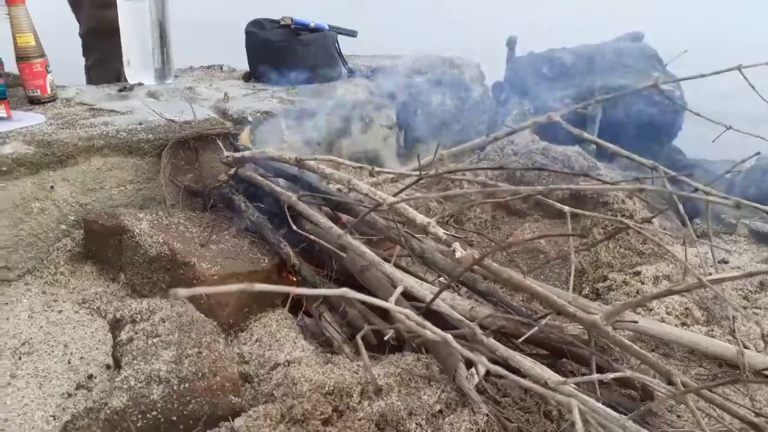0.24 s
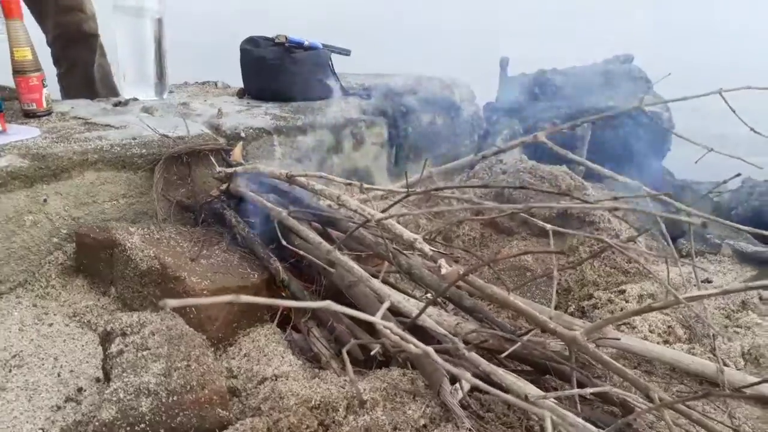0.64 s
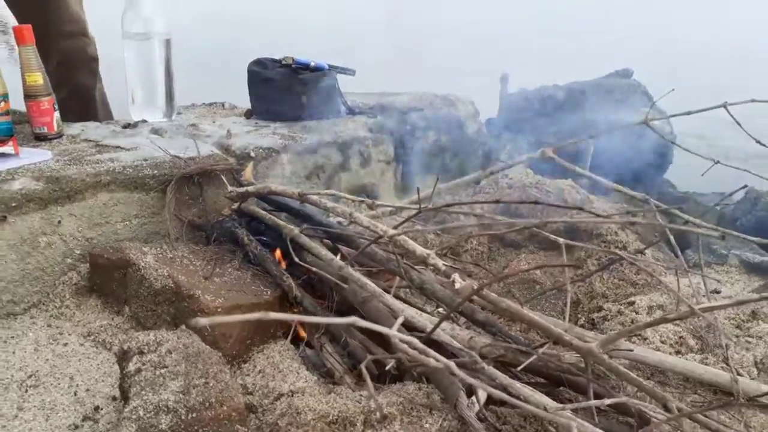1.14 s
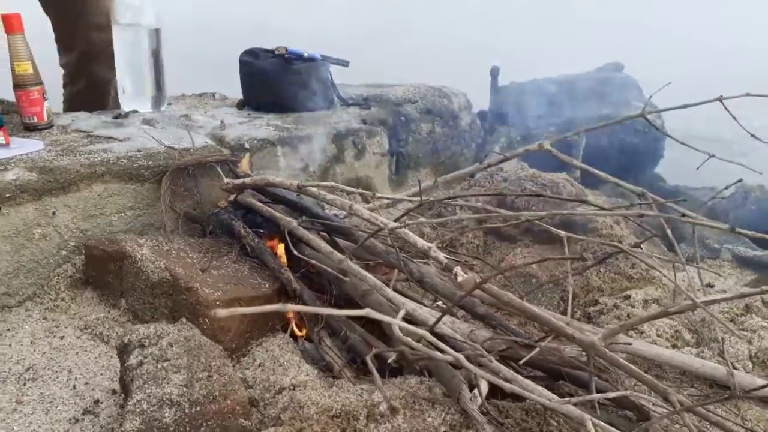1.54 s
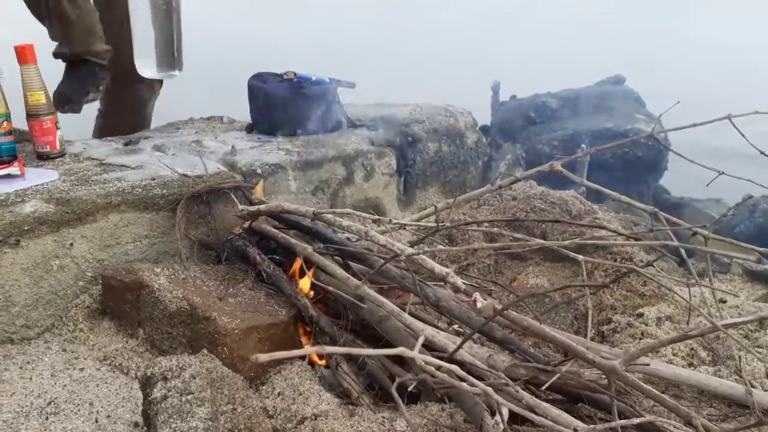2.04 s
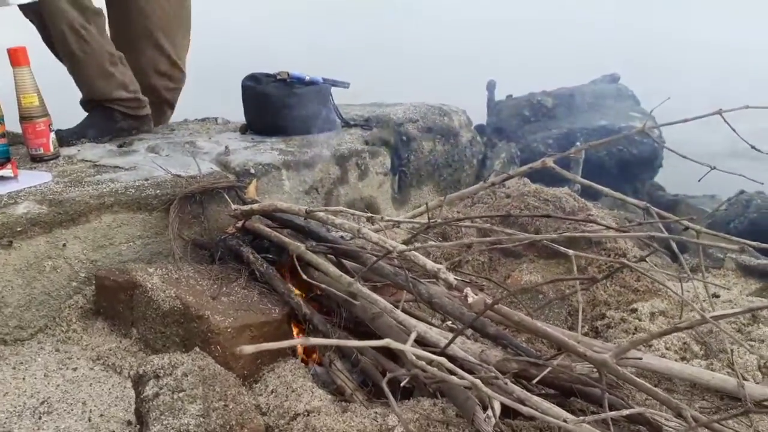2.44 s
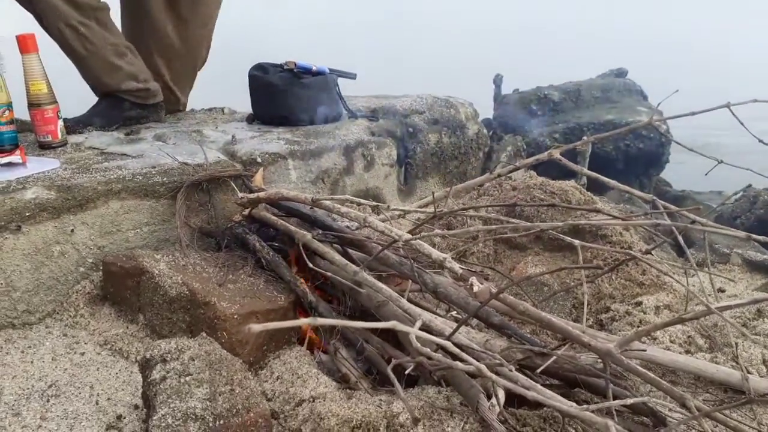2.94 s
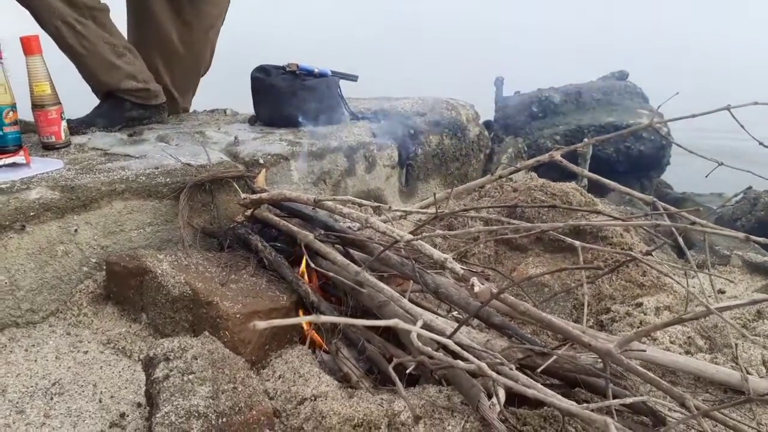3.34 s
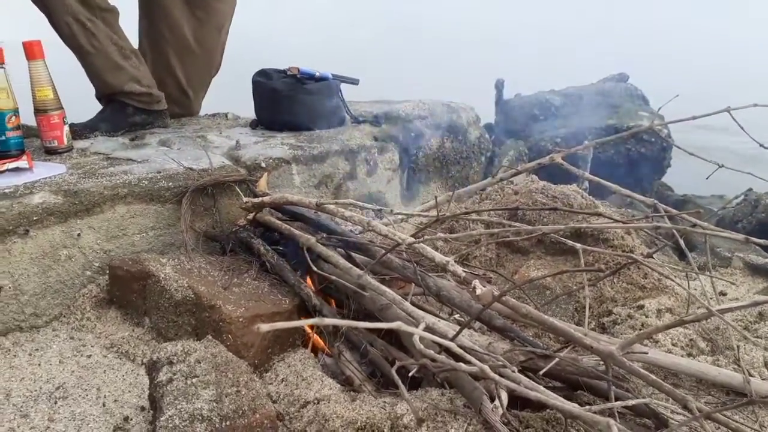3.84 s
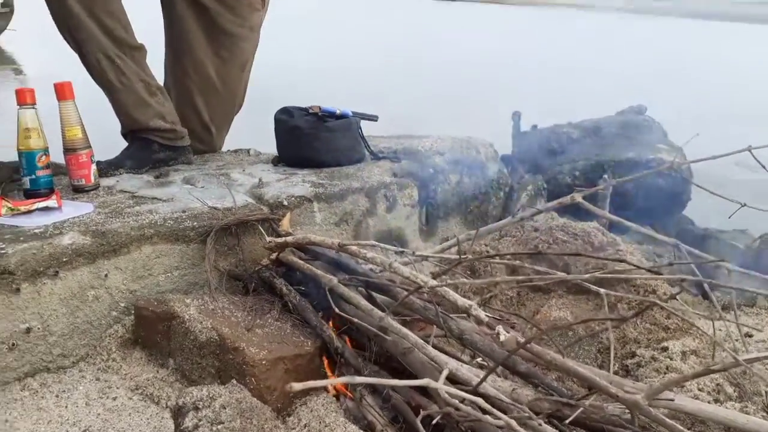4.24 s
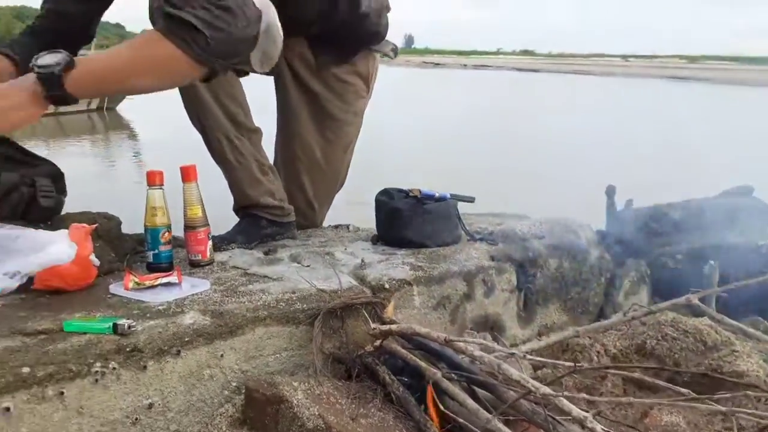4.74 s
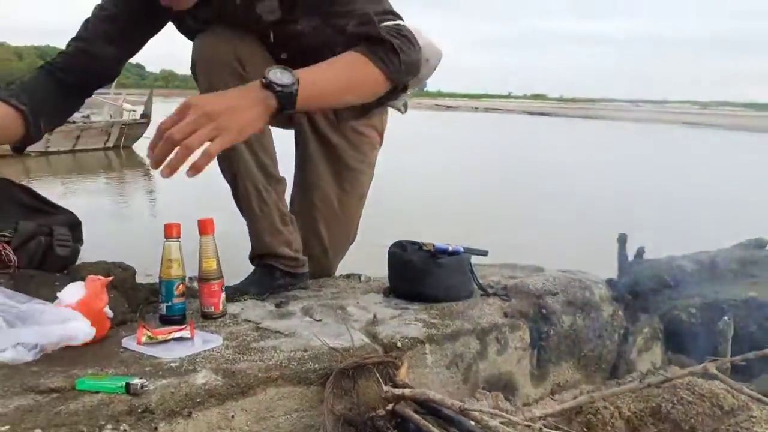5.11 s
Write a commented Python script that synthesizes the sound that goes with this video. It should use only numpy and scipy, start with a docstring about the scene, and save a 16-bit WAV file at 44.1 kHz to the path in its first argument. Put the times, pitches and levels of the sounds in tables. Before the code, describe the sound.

A small fire of dry sticks outdoors, heard close in stereo with hardly any echo, over a steady deep, distant rumble and a fine soft hiss. The opening is quiet, with faint foot scuffs and a weak dull pop at 0.4 s. Near 0.95 s a shoe scrapes gritty ground, together with a strong hollow pop and a few small cracks. After a lull, another slight scrape leads to a loud sharp snap and pop at 2.5 s. At 3.1 s a low thudding pop and brief rub come as steam escapes: a faint, very high whistle, slightly to the right, rises, sags and stops about 3.8 s. Meanwhile crackles thicken from 3.4 to 4.3 s. A bottle touches at 4.2 s and lands with a short, damped knock at 4.4 s, rocking faintly. Pops and shifting sticks come at 4.7-4.9 s, then a plastic bag rustles and flaps, swelling to the end.

```python
"""Small stick fire on a river bank

Dry sticks snap (bursts of noise over a ringing hollow), pop (damped sines) and shift (rubbing noise);
once, steam whistles out of a stick as a gliding sine. Beside it a sole scuffs gritty ground and a bag
rustles (grainy noise under hand-drawn swells), and a bottle is set down on a ledge (ringing modes).
Rumble and hiss of shaped noise lie under it all; near sounds reach the left microphone port first."""
import sys
import numpy as np
from scipy import signal
from scipy.fft import rfft, irfft, next_fast_len
from scipy.io import wavfile
from scipy.ndimage import uniform_filter1d, map_coordinates

SR = 44100
rng = np.random.default_rng(int(sys.argv[2]) if len(sys.argv) > 2 else 0)


def unload_wav(signal):
    """Save mono or channel-first audio to the path in sys.argv[1] as 16-bit WAV at rate SR, clipped to [-1, 1]."""
    wavfile.write(
        sys.argv[1],
        SR,
        np.round(np.clip(np.atleast_2d(signal).T, -1, 1) * 32767).astype(np.int16),
    )


N = 236903  # length in samples


def amp(db):
    """Decibels to gain."""
    return 10 ** (np.asarray(db) / 20)


def unit(x):
    """Scale to rms 1."""
    return x / np.sqrt(np.mean(x ** 2) + 1e-20)


def along(points, hz):
    """Read (f/Hz, value) points on a log frequency axis."""
    f, v = np.transpose(points)
    return np.interp(np.log(hz + 1), np.log(f + 1), v)


def curve(rows):
    """Draw straight lines through (t/s, value) points, one value per sample."""
    s, values = np.transpose(rows)
    return np.interp(np.arange(N) / SR, s, values)


def wobble(rate):
    """A smooth random curve, rate knots a second."""
    knots = rng.standard_normal(int(N * rate / SR) + 4)
    return map_coordinates(knots, [np.arange(N) * rate / SR])


def ramp(start, length):
    """Rise from 0 to 1 over length seconds."""
    return np.clip((np.arange(N) / SR - start) / length, 0, 1)


def strokes(rows):
    """Gain of a series of movements, each swelling to its peak and dying away."""
    t = np.arange(N) / SR
    power = 0
    for s, db, rise, fall in rows:
        drop_db = 20 * np.maximum((s - t) / rise, (t - s) / fall)
        power = power + amp(db - drop_db) ** 2
    return np.sqrt(power)


def filtered(x, response):
    """Multiply the spectrum of x by a response of frequency."""
    m = next_fast_len(N + SR // 2)
    return irfft(rfft(x, m) * response(np.fft.rfftfreq(m, 1 / SR)), m)[..., :N]


def coloured(x, spectrum, size=4096):
    """Causal (minimum-phase) filter with the given spectrum; white noise keeps its power."""
    level_db = np.maximum(along(spectrum, np.fft.rfftfreq(size, 1 / SR)), -100)
    cepstrum = irfft(np.log(amp(level_db)))
    # fold the cepstrum forward in time, so that nothing sounds early
    cepstrum[1:size // 2] *= 2
    cepstrum[size // 2 + 1:] = 0
    kernel = irfft(np.exp(rfft(cepstrum)))
    return signal.fftconvolve(x, kernel[None] / np.linalg.norm(kernel), axes=1)[:, :N]


def blend(pair, alike):
    """Mix two unrelated signals into left and right of the given likeness."""
    def shares(hz):
        turn = np.arccos(np.clip(along(alike, hz), -1, 1)) / 2
        return np.array([np.cos(turn), np.sin(turn)])

    mid, side = filtered(pair, shares)
    return np.array([mid + side, mid - side])


def add(track, s, sound):
    """Mix a sound into a track at time s."""
    start = round(s * SR)
    track[..., start:start + sound.shape[-1]] += sound[..., :N - start]


def ring(modes, scatter_db, detune, rise, size=8000):
    """Damped modes of one blow, each at a new strength and slightly new pitch."""
    t = np.arange(size) / SR
    waves = np.zeros(size)
    for hz, db, t60 in modes:
        strength, bend = rng.standard_normal(2)
        decay = amp(db + scatter_db * strength - 60 * t / t60)
        waves += decay * np.sin(2 * np.pi * hz * (1 + detune * bend) * t)
    return waves * (1 - np.exp(-t / rise))


def tear(rise, t60, spiky_db, size=3000):
    """A quick run of breaking fibres: a spiky burst with the energy of 10 ms at rms 1."""
    t = np.arange(size) / SR
    fibres = amp(spiky_db * unit(uniform_filter1d(rng.standard_normal(size), size=12)))
    envelope = (1 - np.exp(-t / rise)) ** 2 * amp(-60 * t / t60)
    burst = rng.standard_normal((2, size)) * fibres * envelope
    return unit(burst) * np.sqrt(SR / 100 / size)


# likeness of near sounds at the two ports: f/Hz, likeness/0-1
NEAR_LIKENESS = [(400, 1), (1500, 0.71), (5000, 0.56), (14000, 0.21)]


def grains(spectrum, rate, spread_db, smooth):
    """Dense tiny clicks of uneven size, rate a second, on a bed of noise, rms 1."""
    sizes = amp(spread_db * np.clip(rng.standard_normal(N), -2, 2))
    clicks = (rng.random(N) < rate / SR) * sizes
    envelope = signal.lfilter([1], [1, -np.exp(-1 / 36)], clicks)  # time constant of 36 samples
    noise = rng.standard_normal((2, N)) * (unit(envelope) + smooth)
    return unit(blend(coloured(noise, spectrum), NEAR_LIKENESS))


# noise colours of the rumble and the hiss: f/Hz, relative level/dB
RUMBLE_COLOUR = [(12, -62), (20, -49), (32, -39.5), (41, -28), (54, -2), (102, 1), (157, -2.5), (242, -7),
                 (317, -18), (387, -23.5), (447, -25.5), (498, -33.5), (715, -38.5), (921, -40),
                 (1500, -47), (1950, -62), (3300, -120)]
HISS_COLOUR = [(590, -42), (1000, -15), (1300, -15), (1480, -8.5), (1720, -11), (2660, -11.5), (2880, -13),
               (3750, -15), (4610, -6), (6150, -0.5), (7920, 2), (9090, -4.5), (11600, 1.5), (15600, -5)]
# hiss before the steam's share: t/s, level/dB
HISS_LEVEL = [(0, -56), (0.7, -56), (1.6, -59.5), (2.6, -56.5), (4.6, -59.5)]
# likeness of the open air at the two ports: f/Hz, likeness/0-1
AIR_LIKENESS = [(30, 0.81), (100, 0.968), (300, 0.822), (700, 0.16), (1500, 0.023), (15000, 0.043)]
RUMBLE_DB = -48.5  # mean level
STEAM_DB = 1.5  # the hiss is this much louder with the pore fully open


def air():
    """Distant low rumble and a fine hiss that grows while steam escapes: two shaped noises."""
    def rush(colour):
        noise = filtered(rng.standard_normal((2, N)), lambda hz: amp(along(colour, hz)))
        return unit(blend(noise, AIR_LIKENESS))

    rumble_db = RUMBLE_DB + 1.1 * wobble(7)
    hiss_db = curve(HISS_LEVEL) + STEAM_DB * pore() + .35 * wobble(5)
    return amp(rumble_db) * rush(RUMBLE_COLOUR) + amp(hiss_db) * rush(HISS_COLOUR)


# strokes of a sole: t/s of the peak, level/dB, rise by 20 dB/s, fall by 20 dB/s
SOLE_STROKES = [(0.21, -52.5, 0.08, 0.1266), (0.57, -55.5, 0.05, .17), (0.85, -44, 0.0457, 0.25),
                (0.955, -30, 0.1134, 0.0732), (1.1, -50.5, 0.2065, 0.2264), (2.38, -51, .09, .23),
                (2.555, -44.5, 0.1672, 0.0179)]
# noise colour of grit: f/Hz, relative level/dB
GRIT_COLOUR = [(150, -8.5), (400, -7.5), (1000, -7), (1500, -5), (2700, -2.5), (3700, -2.5), (6000, -1.5),
               (8000, -2.5), (10000, -3), (14000, -3.5), (16000, -18.5)]


def scuffs():
    """A sole drags over sand grains, each grain a click."""
    sand = grains(GRIT_COLOUR, rate=800, spread_db=4, smooth=.7)
    return strokes(SOLE_STROKES) * sand


# dull pops, a cycle or two long: t/s, level/dB, f/Hz
GAS_POPS = [(0.437, -36, 440), (0.9728, -13.5, 878), (1.1, -38.5, 481), (1.86, -36.5, 429),
            (2.511, -13.5, 424), (2.5115, -19, 888), (3.1421, -21, 242.3), (4.663, -24.5, 367),
            (4.83, -18.5, 504), (4.882, -28, 215)]


def pops(cycles=6, rise=0.00048, size=3000):
    """A pocket of gas gives way with one push of air, damped by 60 dB in so many cycles."""
    out, t = np.zeros(N), np.arange(size) / SR
    for s, db, hz in GAS_POPS:
        push = amp(db - 60 * t * hz / cycles) * (1 - np.exp(-t / rise))
        add(out, s, push * np.sin(2 * np.pi * hz * t))
    return out


# sticks splitting: t/s, level/dB, brightness (fine up, coarse down)/dB,
# snap of the middle fibres over the level/dB, level of the thud in the hollow/dB
SPLITS = [(0.814, -53, 5.5, 0, -56), (0.973, -43.5, -6.5, -8, -31), (0.985, -40, 5, -9.5, -55),
          (1.101, -50, -3, -11.5, -42.5), (1.133, -53.5, 3.5, 1, -69), (1.156, -52, 4, -3, -65.5),
          (1.18, -59, -5.5, 1.5, -56), (2.304, -64, 11.5, -5.5, -67), (2.451, -57, 7.5, -2, -64),
          (2.509, -30, 1, -2.5, -26), (2.522, -45.5, 8.5, -5, -38), (2.538, -45, -0.5, 0.5, -50.5),
          (2.549, -47.5, 4, -1, -59.5), (2.807, -61, 8.5, 1.5, -60), (3.142, -40, 7, -1, -20),
          (3.177, -49.5, -2.5, 1, -52.5), (3.188, -49.5, -0.5, 0.5, -33), (3.406, -48, 3, 5.5, -31.5),
          (3.628, -52, 7, 2.5, -37), (3.66, -54.5, 4, 2.5, -49.5), (3.687, -46, 1, 8.5, -44.5),
          (3.722, -47.5, 3, 3, -34.5), (3.756, -47.5, 2, 2, -44), (3.802, -52, -2, 3.5, -31.5),
          (3.835, -37, 0.5, 4, -35), (3.844, -46.5, 2.5, 3.5, -36), (3.867, -53.5, -2, 2.5, -54),
          (3.931, -48, 7, 6, -40), (3.953, -51, 4, 5.5, -39), (4.185, -38, -3, -5.5, -40.5),
          (4.251, -45, -0.5, 2, -38), (4.258, -43, 2, 5, -49), (4.489, -58, -1.5, 4.5, -35),
          (4.581, -48.5, -0.5, 2.5, -47), (4.829, -39, 0.5, -7.5, -28.5), (4.966, -51.5, 4, -4.5, -56),
          (5.112, -55, 3, 0, -48.5)]
# modes of the hollow under the sticks: f/Hz, level/dB, t60/s
HOLLOW_MODES = [(258, -7, 0.0124), (378.06, -2, 0.0672), (423, -5, 0.0381), (497.8, -14.5, 0.109),
                (687.5, -14, 0.0507)]
# noise colours of coarse, middle and fine fibres: f/Hz, relative level/dB
CRACK_COLOUR = [(300, -18), (750, -1.5), (1100, -10.5), (1550, -2.5), (1950, -5), (2500, 1.5), (3100, -4),
                (4000, -9.5), (8000, -27.5)]
SNAP_COLOUR = [(1500, -31.5), (3000, -14), (3800, -5.5), (4600, -0.5), (5800, 0.5), (7000, -11.5),
               (9500, -20.5)]
SPIT_COLOUR = [(3000, -38.5), (6000, -9), (7600, 7.5), (9700, -3), (11500, 1.5), (14000, -6.5),
               (16000, -3.5)]


def snaps():
    """Each split tears coarse, middle and fine fibres at once and thumps the hollow."""
    thuds = np.zeros(N)
    coarse, middle, fine = np.zeros((3, 2, N))
    for s, db, bright_db, snap_db, thud_db in SPLITS + ticks():
        hollow = ring(HOLLOW_MODES, scatter_db=2.5, detune=.015, rise=.003)
        add(thuds, s + 0.00105, amp(thud_db) * hollow)  # about 1 ms after the tear begins
        add(coarse, s, amp(db - bright_db) * tear(rise=0.00044, t60=0.0736, spiky_db=4))
        add(middle, s, amp(db + snap_db) * tear(rise=0.00072, t60=0.0448, spiky_db=5.0))
        add(fine, s, amp(db + bright_db) * tear(rise=0.00055, t60=0.0227, spiky_db=2.5))
    crack, snap = coloured(coarse, CRACK_COLOUR), coloured(middle, SNAP_COLOUR)
    spit = coloured(fine, SPIT_COLOUR)
    return thuds + blend(crack + snap + spit, NEAR_LIKENESS)


PORE_OPENS_S, PORE_CLOSES_S = 3.034, 3.83  # start of the opening, middle of the closing
PORE_FADE_S = 0.103  # length of either


def pore():
    """How far the steam's pore is open, 0-1."""
    opening = ramp(PORE_OPENS_S, PORE_FADE_S)
    closing = ramp(PORE_CLOSES_S - PORE_FADE_S / 2, PORE_FADE_S)
    return np.sqrt(opening * (1 - closing))


# surge of steam pressure: start, rise, hold, time constant of its sag
SURGE_S, SURGE_RISE_S, SURGE_HOLD_S, SURGE_SAG_S = 3.09, 0.0455, .08, 0.076
WHISTLE_HZ, SURGE_HZ = 11095, 345  # mean pitch at rest, and what the full surge adds
WHISTLE_DB, SURGE_DB = -62.5, 2  # level at rest before the tilt to the right, what the surge adds


def whistle():
    """Steam through a fine pore sings, beamed to the right; pitch and level follow its pressure."""
    sagging = np.maximum(np.arange(N) / SR - SURGE_S - SURGE_RISE_S - SURGE_HOLD_S, 0)
    surge = ramp(SURGE_S, SURGE_RISE_S) * np.exp(-sagging / SURGE_SAG_S)
    pitch_hz = WHISTLE_HZ + SURGE_HZ * surge + 9 * wobble(120) + 12 * wobble(8)
    level_db = WHISTLE_DB + SURGE_DB * surge + wobble(30)
    sine = np.sqrt(2) * np.sin(2 * np.pi * np.cumsum(pitch_hz) / SR)
    return pore() * amp(level_db) * sine * amp([[-3], [2.5]])  # left, right dB


# low rubbing: sticks shifting, and at 4.49 and 5.1 s the hand at work:
# t/s of the peak, level/dB, rise by 20 dB/s, fall by 20 dB/s
RUBBING_STROKES = [(3.197, -37.5, 0, 0.0509), (3.68, -52.5, 0.1058, 0.39), (3.85, -50, 0.1625, 0.49),
                   (4.23, -57, 0.01, 0.14), (4.49, -54, 0.1842, 0.5), (4.885, -43.5, 0.0679, 0.08),
                   (5.1, -61.5, 0.28, 0.56)]
BARK_DB = -14.5  # crumbs against the low rubbing


def rubbing():
    """Shifting sticks, or the hand at work, rub low through the hollow's modes and shed gritty crumbs."""
    hollow = ring(HOLLOW_MODES, scatter_db=0, detune=0, rise=.001)
    rub = signal.fftconvolve(rng.standard_normal(N), hollow)[:N]
    bark = grains(GRIT_COLOUR, rate=150, spread_db=4, smooth=.4)
    return strokes(RUBBING_STROKES) * (unit(rub) + amp(BARK_DB) * bark)


TICKS_FROM_S, TICKS_TO_S = 3.6, 5.2
# means over all ticks, and their spread; bright: mostly fine fibres, then middle ones
TICK_DB, TICK_BRIGHT_DB, TICK_SNAP_DB, TICK_THUD_DB, TICK_SPREAD_DB = -65, 7, 4.5, -64.5, 2


def ticks(count=20):
    """Tiny splits at random moments, of uneven size and colour, as rows for snaps()."""
    rows = []
    for s in rng.uniform(TICKS_FROM_S, TICKS_TO_S, count):
        size, bright, snap = TICK_SPREAD_DB * rng.standard_normal(3)
        rows.append((s, TICK_DB + size, TICK_BRIGHT_DB + bright, TICK_SNAP_DB + snap, TICK_THUD_DB + size))
    return rows


# the bottle touching the ledge: t/s, level/dB
BOTTLE_KNOCKS = [(4.1875, -33), (4.204, -52), (4.3832, -15), (4.421, -43), (4.477, -45.5), (4.485, -47.5),
                 (4.585, -49.5), (4.674, -49.5)]
# modes of the bottle out of the hand: f/Hz, level/dB, t60/s
BOTTLE_MODES = [(385.5, -9.5, 0.064), (912.5, 5, 0.0615), (1545, 5.5, 0.0226), (1668.5, 3, 0.023),
                (1858, 6, 0.0063), (2270, -1, 0.00675), (2620, -18.5, 0.0087), (3084, -5.5, 0.0134)]
GRIP_LOSS_DB_PER_S = 140  # the hand round the bottle damps its ring


def bottle():
    """The bottle touches, lands and rocks to rest in the hand, crushing a little grit each time."""
    body, grit = np.zeros(N), np.zeros((2, N))
    held = [(hz, db, 60 / (60 / t60 + GRIP_LOSS_DB_PER_S)) for hz, db, t60 in BOTTLE_MODES]
    for s, db in BOTTLE_KNOCKS:
        add(body, s, amp(db) * ring(held, scatter_db=.7, detune=.003, rise=.0003))
        add(grit, s - .001, amp(db - 14) * tear(rise=.0008, t60=.028, spiky_db=2))
    return body + blend(coloured(grit, CRACK_COLOUR), NEAR_LIKENESS)


# the hand working the bag, and its folds flapping:
# t/s of the peak, level/dB, rise by 20 dB/s, fall by 20 dB/s
BAG_STROKES = [(4.56, -55, 0.5658, 0.03), (4.8, -56, 0.44, .5), (5.05, -56, 0.41, 0.45),
               (5.23, -42, 0.1033, 0.92), (5.37, -35.5, 0.221, 0.5)]
FOLD_FLAPS = [(5.28, -41, 0.1, 0.14), (5.355, -43.5, 0.1, 0.57)]
# noise colours of creases and folds: f/Hz, relative level/dB
CRINKLE_COLOUR = [(600, -32.5), (1100, -5.5), (2000, 0.5), (4000, -1.5), (8000, -2.5), (13000, -5),
                  (16000, -13.5)]
FLAP_COLOUR = [(150, -20), (380, 0), (580, -7), (830, 1), (1100, -9), (2500, -25)]
FLUTTER_DB = -13  # the folds' steady flutter against the crinkling


def bag():
    """Thin plastic crinkles as hard as it is handled, while its folds flutter and flap."""
    vigour = strokes(BAG_STROKES)
    creases = grains(CRINKLE_COLOUR, rate=800, spread_db=3.7, smooth=.7)
    folds = grains(FLAP_COLOUR, rate=400, spread_db=3, smooth=.8)
    flapping = vigour * amp(FLUTTER_DB) + strokes(FOLD_FLAPS)
    return vigour * creases + flapping * folds


# head start of the left port: t/s, lead/ms
LEFT_LEAD = [(0, 0.3393), (3.2, 0.4168), (4.25, 0.3717), (4.4, 0.357), (5.3, 0.2787)]


def ports(x):
    """Near sounds reach the right port a fraction of a millisecond late."""
    late = np.arange(N) - curve(LEFT_LEAD) * SR / 1000
    return np.array([x[0], map_coordinates(x[1], [late], order=5)])


# decay of the scatter off the bank: f/Hz, t60/s
BANK_DECAY = [(300, .2), (1500, .07), (10000, .05)]


def bank(x):
    """Stones and ground scatter a short, dark tail, here decaying noise 5 ms late."""
    hz, t, z = signal.stft(rng.standard_normal((2, SR // 3)), SR, nperseg=256)
    decay = amp(-60 * t / along(BANK_DECAY, hz)[:, None])
    tail = signal.istft(z * decay, SR, nperseg=256)[1]
    delayed = np.pad(tail, ((0, 0), (SR // 200, 0))) / np.linalg.norm(tail[0])
    return signal.fftconvolve(x, delayed, axes=1)[:, :N]


def scene():
    """Near sounds with their faint scatter, over the open air."""
    near = ports(scuffs() + pops() + snaps() + rubbing() + bottle() + bag())
    scatter = amp(-22) * bank(near)
    return near + scatter + whistle() + air()


# colour of the ports: f/Hz, left over right/dB
PORT_TILT = [(60, -2.5), (200, -2.5), (450, -2.5), (800, 0), (1450, -3.5), (2000, -0.5), (5000, 0),
             (12000, 1.5)]
LOW_CUT_HZ, TOP_HZ = 31.6, 15800


def record(dry):
    """Each port has its own colour; the deepest bass is cut and nothing passes above the band limit."""
    def response(hz):
        tilt = amp(np.outer([.5, -.5], along(PORT_TILT, hz)))  # half up on one side, half down on the other
        low_cut = (1j * hz / (LOW_CUT_HZ + 1j * hz)) ** 2
        return tilt * low_cut * (hz < TOP_HZ)

    return filtered(dry, response)


dry = scene()
out = record(dry)
unload_wav(out)
```